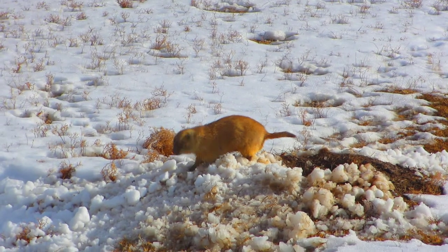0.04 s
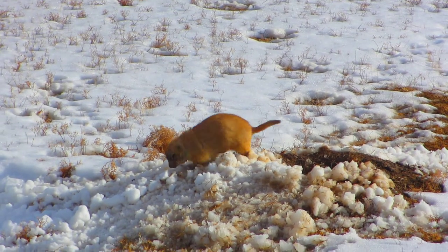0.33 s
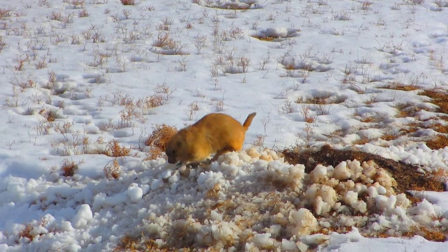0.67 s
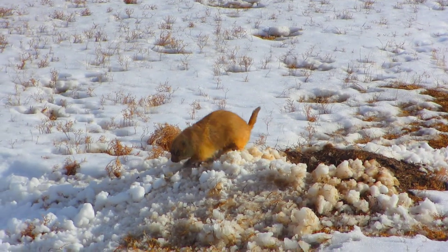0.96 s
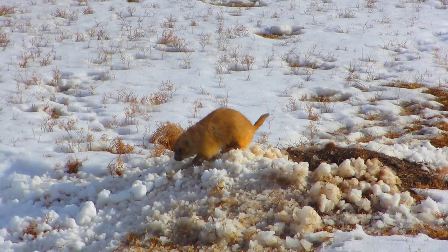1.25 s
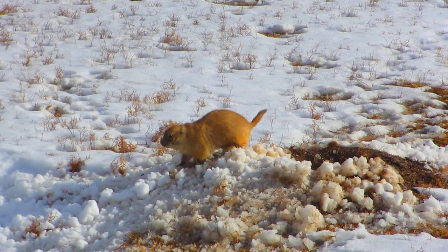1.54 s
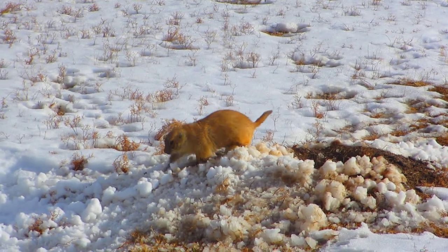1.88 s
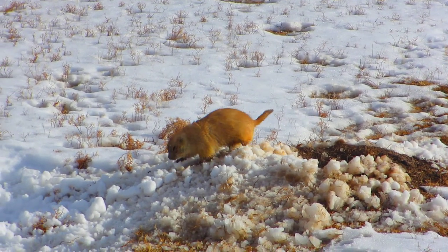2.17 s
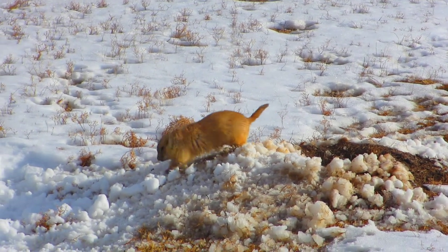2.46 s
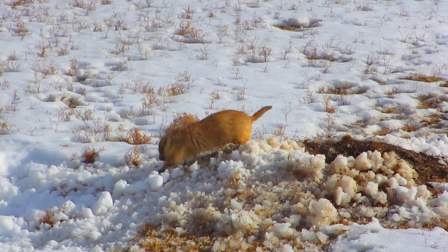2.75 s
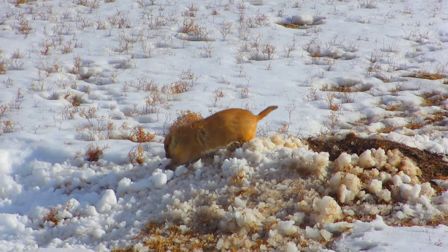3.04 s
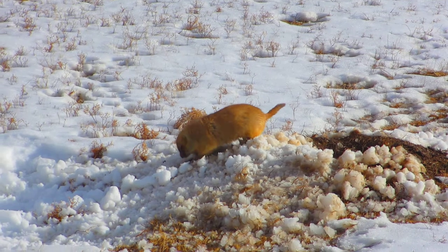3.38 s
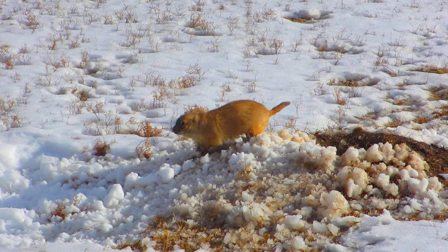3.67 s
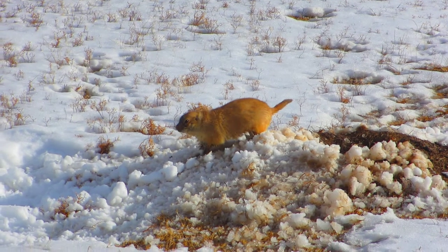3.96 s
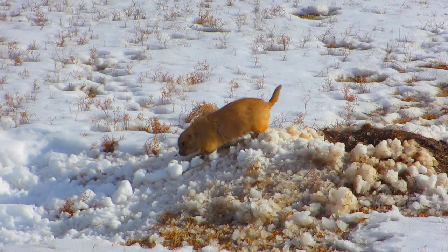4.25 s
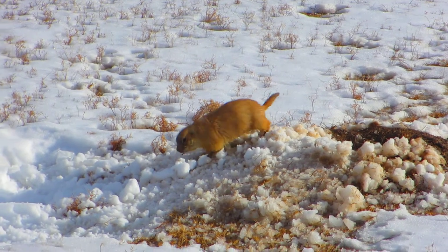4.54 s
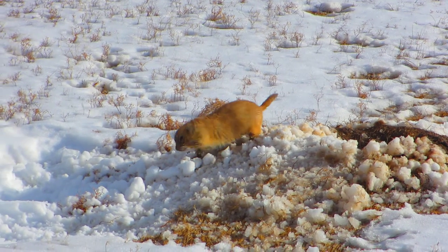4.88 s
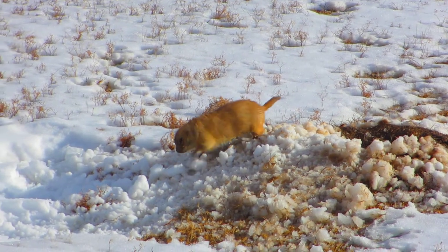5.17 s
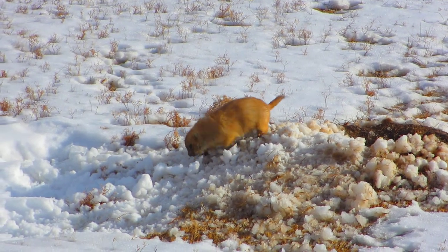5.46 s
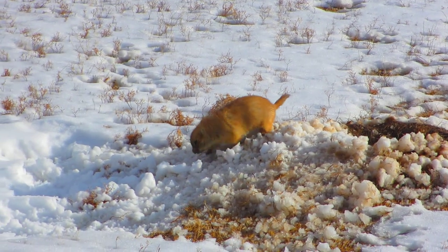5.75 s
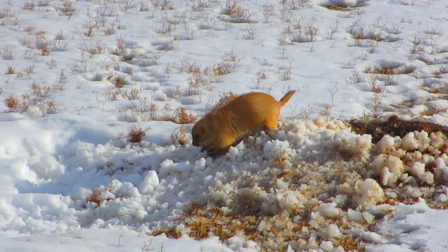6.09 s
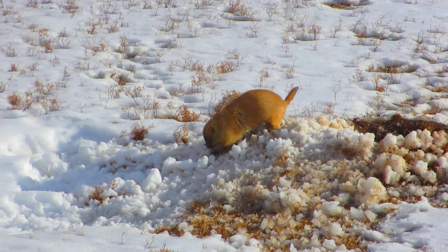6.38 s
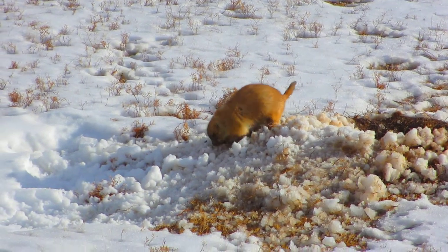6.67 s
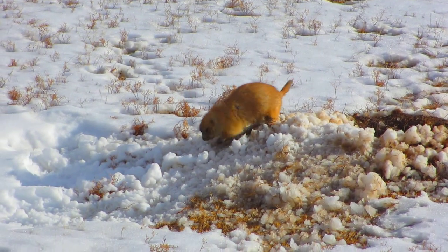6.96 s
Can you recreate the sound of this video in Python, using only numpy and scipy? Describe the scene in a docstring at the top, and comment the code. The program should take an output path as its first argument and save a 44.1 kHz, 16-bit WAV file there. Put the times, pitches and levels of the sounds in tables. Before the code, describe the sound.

Wind gusts thump the microphone over a far traffic drone, with two distant prairie dog yips and very faint snow scraping.

```python
"""Gusts of wind buffet a closely spaced microphone pair on a snowy prairie, their eddies thumping the ports.
The hardest gust overloads the pair and makes the gain control duck. Far traffic drones underneath,
with the camera's own faint whine and hiss. Two prairie dogs each give a distant rising and falling yip,
hoarse where the vocal folds turn chaotic; another scrapes softly at the snow, snapping its crust."""
import sys
import numpy as np
from scipy import signal
from scipy.fft import rfft, irfft
from scipy.io import wavfile
from scipy.ndimage import uniform_filter1d, map_coordinates

SR = 44100
rng = np.random.default_rng(int(sys.argv[2]) if len(sys.argv) > 2 else 0)


def materialize(psi):
    """Save the field psi as 16-bit PCM at rate SR to the path in sys.argv[1].

    A 1-D psi becomes a single channel; in a 2-D psi each row is a channel.
    """
    bounded = np.clip(np.atleast_2d(psi).T, -1, 1)
    quanta = np.round(bounded * 32767).astype(np.int16)
    wavfile.write(sys.argv[1], SR, quanta)


N = 309582
TIME = np.arange(N) / SR
FREQS = np.maximum(np.arange(N // 2 + 1) * SR / N, 1)


def from_db(db):
    """Decibels to gain."""
    return 10 ** (np.asarray(db) / 20)


def over_hz(rows):
    """Each column after the first, joined on a log-frequency axis."""
    hz, *columns = np.transpose(rows)
    return [np.interp(np.log(FREQS), np.log(hz), column) for column in columns]


def white():
    """Spectrum of fresh white noise."""
    return rfft(rng.standard_normal(N))


def noise(gain):
    """Noise with the given gain per frequency; rms 1."""
    x = irfft(white() * gain, N)
    return x / x.std()


def drift(rate_hz):
    """Random wandering, mostly slower than the given rate; spread 1."""
    return noise(1 / (1 + (FREQS / rate_hz) ** 2))


# Far rumble fading into microphone hiss, on the right. Each row: frequency in Hz, relative level in dB.
RUMBLE_COLOUR = [(22, -66), (50, -65), (115, -61), (200, -61.5), (310, -66), (410, -72.5), (650, -71),
                 (960, -73.5), (1900, -86), (2700, -94.5), (3800, -104.4), (6000, -108.2), (11500, -107.3),
                 (14200, -110.6), (15700, -111.3)]
# Engines standing out of the rumble. Each row: frequency in Hz, width in Hz, rise in dB.
ENGINE_DRONES = [(90, 1.8, 14), (138, 15.5, 8), (165, 22, 2), (259.9, 5.4, 10), (329.6, 9.5, 4.5),
                 (513, 8.2, 3.5), (618.3, 10, 7), (700, 7.1, 5), (789, 27, 3), (844.5, 14, 6),
                 (1330, 6.1, 11)]
# How the pair hears far sound. Each row: frequency in Hz, left over right in dB, coherence from 0 to 1,
# left phase lead in radians.
PAIR_RESPONSE = [(61, -10, 0.97, 4), (158, -11.5, 0.84, 2.6), (293, -7, 0.9, 2.33), (580, -6, 0.97, 1.9),
                 (1030, -6, 0.68, 1.27), (1380, -4.5, 0.52, 1.66), (2140, -2.5, 0.6, 0.48),
                 (3840, -3.5, 0.52, 0.86), (8540, -2.5, 0.55, 0.53), (13000, -1.5, 0.1, 1.3)]

def far_traffic(level_db=-1.14, waver_db=0.5):
    """Engines drone far across the prairie; the pair turns their bass nearly into opposite phase."""
    colour_db, = over_hz(RUMBLE_COLOUR)
    colour_db += sum(db / (1 + (2 * (FREQS - hz) / width) ** 2) for hz, width, db in ENGINE_DRONES)
    balance_db, coherence, lead = over_hz(PAIR_RESPONSE)
    right = white()
    shared = coherence * np.exp(1j * lead) * right
    left = from_db(balance_db) * (shared + np.sqrt(1 - coherence ** 2) * white())
    pair = irfft(np.array([left, right]) * from_db(colour_db) * np.sqrt(SR / 2), N)
    return pair * from_db(level_db + waver_db * drift(0.73))


def camera(whine_db=-96, whine_hz=2074, hiss_db=-74.5, hiss_hz=12300, hiss_width_hz=1500, pulse_hz=17):
    """The camera's own faint noise: a thin whine of three overtones and a high hiss that pulses quickly."""
    whine = sum(np.sin(2 * np.pi * k * whine_hz * TIME) for k in (2, 3, 6))
    colour = np.exp(-0.5 * ((FREQS - hiss_hz) / hiss_width_hz) ** 2)
    pulsing = (0.5 + 0.5 * np.cos(2 * np.pi * pulse_hz * TIME + drift(3))) ** 2
    hiss = np.array([noise(colour), noise(colour)])
    return from_db(whine_db) * whine + from_db(hiss_db) * pulsing * hiss


# Gusts at the microphones. Each row: start in seconds, level in dB, hold in seconds, eddy speed factor.
GUSTS = [(0.133, -14.5, 0.011, 0.56), (0.211, -23.5, 0.042, 0.93), (0.363, -13, 0.014, .85),
         (0.383, -13.5, 0.0254, 1.1), (0.427, -15.5, 0.061, 1.05), (0.507, -24, 0.0784, .95),
         (1.692, -23, 0.061, 0.83), (1.977, -23, 0.0514, 1.0), (2.1, -20, 0.0605, 0.88),
         (2.487, -27.5, 0.033, 0.81), (2.575, -29, 0.031, 0.73), (2.726, -24.5, 0.03, 0.82),
         (2.805, -25, 0.021, .8), (3.337, -24, 0.032, .92), (3.769, -34, 0.019, .8),
         (3.888, -27, 0.034, 0.91), (3.96, -31, 0.032, 0.76), (4.554, -27.5, 0.018, 0.85),
         (4.869, -16.5, 0.012, 1.1), (4.901, -10, 0.027, 1.0), (4.946, -20.5, 0.017, .9),
         (5.45, -26, 0.058, 0.8), (5.57, -25, 0.036, 0.99), (5.766, -30, 0.023, 0.71),
         (6.207, -36, 0.019, 0.75)]

def gust_strength(attack_s=0.00607, sag_db=3, release_share=0.332, breeze_db=-46.5, flutter_db=1):
    """Each gust rises fast, sags while it holds and dies away, over a wandering breeze."""
    power = from_db(breeze_db + 4 * np.tanh(drift(5))) ** 2
    for start, db, hold, _ in GUSTS:
        age = TIME - start
        attack = np.exp(-(np.minimum(age, 0) / attack_s) ** 2)
        release = np.exp(-np.maximum(age - hold, 0) / (release_share * hold))
        level = from_db(db - sag_db * np.clip(age / hold, 0, 1))
        power += (attack * release * level) ** 2
    return np.sqrt(power) * from_db(flutter_db * drift(22))


# Turbulence on the microphone ports at speed 1. Each row: frequency in Hz, relative level in dB.
TURBULENCE_COLOUR = [(18, -46), (45, -16.5), (80, 2), (140, 1.5), (220, -5.5), (400, -19.5), (800, -54),
                     (2000, -100)]

def turbulence(strength, reference_db=-20, speed_power=0.41, evenness=0.17):
    """A frozen pattern of eddies blows past: a stronger gust carries it faster, so it is brighter too."""
    speed_points = [(s, factor) for start, _, hold, factor in GUSTS for s in (start, start + hold)]
    speed = np.interp(TIME, *np.transpose(speed_points))
    speed *= np.maximum(strength / from_db(reference_db), 0.3) ** speed_power
    pattern = noise(from_db(over_hz(TURBULENCE_COLOUR)[0]))
    pressure = map_coordinates(pattern, [np.cumsum(speed)], order=3, mode="wrap")
    # the gust, more than the pattern, sets the loudness
    local_power = uniform_filter1d(uniform_filter1d(pressure ** 2, size=700), size=500)
    return strength * pressure / local_power ** (evenness / 2)


# Single eddies right on the ports. Each row: time in seconds, relative level in dB,
# half length in seconds, level offset of the wake in dB.
EDDY_THUMPS = [(0.1223, -2, 0.00067, 1), (.3645, -12, .0017, -8), (0.3896, -9, 0.0009, -8),
               (0.3972, -6, 0.0007, -10), (.4035, -4.5, .0011, -12), (.4385, -5, .001, -14),
               (0.445, -9, 0.0007, -6), (.4635, -12, 0.001, -12), (1.976, -11, 0.0017, -10),
               (2.088, -14, .0018, -14), (2.114, -13, .0009, -14), (2.1215, -8, 0.0014, -8),
               (4.8578, -2, 0.0019, -31), (4.8695, -1, 0.0012, -14), (4.8797, -4, .001, -20),
               (4.886, 10.5, 0.00062, -24)]

def eddies(wake_delay=6, wake_stretch=2):
    """An eddy thumps the ports with one push and one pull, and sheds a slower one spinning the other way."""
    pressure = np.zeros(N)
    for s, db, half_s, wake_db in EDDY_THUMPS:
        age = (TIME - s) / half_s  # in half lengths
        wake_age = (age - wake_delay) / wake_stretch
        for spin, u, level_db in ((0.68, age, db), (-1, wake_age, db + wake_db)):
            pressure -= spin * from_db(level_db) * u * np.exp((1 - u ** 2) / 2)
    return pressure


def wind(left_db=-3, left_lag_s=0.0001, swirl_db=-16, low_cut_hz=42):
    """Wind presses on the two ports in opposite phase, with a little swirl of its own on the left."""
    strength = gust_strength()
    right = turbulence(strength) + eddies()
    delayed = np.interp(TIME - left_lag_s, TIME, right)
    left = -from_db(left_db) * delayed + from_db(swirl_db) * turbulence(strength)
    # the deepest bass leaks away
    return irfft(rfft([left, right]) / np.sqrt(1 + (low_cut_hz / FREQS) ** 4), N)


# Snow crust breaking under claws. Each row: start in seconds, relative level in dB, pitch in Hz.
CRUST_SNAPS = [(.092, -73, 13000), (1.325, -73, 12960), (2.2, -71, 12720), (2.32, -71, 9400),
               (3.79, -73, 12930), (4.317, -73, 13300), (5.713, -70, 10580), (5.962, -68, 13100),
               (6.376, -66, 9900), (6.467, -71, 12300)]

def crust_snaps(decay_s=0.014, width_hz=1000, crumb_count=30, crumb_db=-78, size=4000):
    """Snaps and smaller random crumbs: each starts at once and dies quickly, ringing at its own pitch."""
    crumb_starts = rng.uniform(0, N / SR, crumb_count)
    crumbs = [(s, crumb_db, rng.normal(12000, 1500)) for s in crumb_starts]
    snaps = np.zeros(N + size)
    freqs = np.fft.rfftfreq(size, 1 / SR)
    decay = np.exp(-TIME[:size] / decay_s)
    for s, db, hz in CRUST_SNAPS + crumbs:
        crackle = irfft(rfft(rng.standard_normal(size)) / (1 + ((freqs - hz) / width_hz) ** 2))
        start = int(s * SR)
        snaps[start:start + size] += from_db(db) * decay * crackle / crackle.std()
    return snaps[:N]


# Two distant prairie dogs, right of centre. Each row: middle of the rasp in seconds, its half length in
# seconds, then in dB: relative level, offset above the second harmonic, left over right, dip in the rasp.
YIPS = [(0.195, 0.018, -55, -14, -6, 0.5), (1.801, 0.0078, -52.5, -8.5, -5, 4.5)]
# One pitch curve for each yip. Each point: time in seconds, pitch in Hz.
YIP_PITCH = [
    [(.156, 1480), (.172, 1825), (.205, 2060), (.215, 1810), (.232, 1910), (.26, 1760), (.3, 1580),
     (.33, 1530), (.384, 1385)],
    [(1.738, 1345), (1.755, 1666), (1.762, 1613), (1.786, 1790), (1.801, 1900), (1.812, 1820),
     (1.815, 1710), (1.84, 1630), (1.894, 1370)],
]
# Resonances of the throat. Each row: frequency in Hz, gain in dB.
THROAT_COLOUR = [(1500, -2), (2000, -2.5), (2900, -6.5), (3700, -2), (4300, -10), (5200, -5.5), (6700, -8),
                 (7600, -19)]

def yip(pitch, rasp_at_s, rasp_half_s, db, overtones_db, balance_db, rasp_dip_db,
        swell_db=4, sag_db=5, dulling_db=5, flutter_db=2, trim_db=-1, edge_s=0.0045):
    """A prairie dog's thin call scoops up hoarsely, cracks into a rasp and sinks clear, fading."""
    times, pitch_hz = np.transpose(pitch)
    start, end = times[0], times[-1]
    rise_left = np.clip((rasp_at_s - TIME) / (rasp_at_s - start), 0, 1)
    fall = np.clip((TIME - rasp_at_s) / (end - rasp_at_s), 0, 1)
    strain = np.exp(-0.5 * ((TIME - rasp_at_s) / rasp_half_s) ** 4)
    roughness = np.where(TIME < rasp_at_s, 0.486, 0.15)  # hoarse rise, clear fall
    roughness += (0.8 - roughness) * strain  # roughest in the rasp
    hz = np.interp(TIME, times, pitch_hz) * (1 + 0.00583 * drift(25))
    jitter = 0.028 * (roughness + strain) * drift(300)
    phase = 2 * np.pi * np.cumsum(hz * (1 + jitter)) / SR
    voice = np.zeros(N)
    for k in range(1, 5):
        # chaotic vocal folds smear each harmonic into a band of noise, the higher ones more
        smear = np.minimum(roughness * k / 2, 1)
        rasp = drift(480) * np.cos(k * phase)
        tone = np.sqrt(1 - smear ** 2) * np.sin(k * phase) + smear * rasp
        colour_db = np.interp(k * hz, *np.transpose(THROAT_COLOUR))
        if k > 2:
            colour_db += overtones_db - dulling_db * fall * (k - 2)
        voice += tone * from_db(colour_db + flutter_db * drift(75))
    voice *= 1 + 0.43 * roughness * np.cos(phase / 2)  # strong and weak cycles alternate
    opening = np.clip(np.minimum(TIME - start, end - TIME) / edge_s, 0, 1)
    level_db = db + trim_db - swell_db * rise_left - sag_db * fall ** 2 - rasp_dip_db * strain
    return np.sqrt(2) * voice * opening * from_db(level_db) * from_db([[balance_db], [0]])


# A third prairie dog's paws, faint at the microphones. Each row: middle of the scrape in seconds,
# relative level in dB, half length in seconds.
PAW_SCRAPES = [(.91, -74.5, 0.037), (1.18, -76, 0.061), (1.32, -76, 0.027), (2.06, -77, 0.033),
               (2.64, -73.5, 0.038), (2.94, -72.5, 0.022), (3.18, -73, 0.021), (3.255, -69.5, 0.0093),
               (3.46, -77, 0.02), (5.402, -68, 0.014), (5.45, -73, 0.025), (5.76, -73, 0.024),
               (5.80, -66, 0.014), (5.91, -69, 0.018), (5.965, -72, 0.0077), (6.22, -77, 0.037),
               (6.48, -73, 0.069), (6.56, -74, 0.023)]
# The hiss of scraped snow. Each row: frequency in Hz, relative level in dB.
SNOW_COLOUR = [(3000, -25), (6000, -10), (8500, -2.5), (11000, 0.5), (13000, -2.5), (16000, -8)]

def paw_scrapes(level_db=2, grain_db=3, grain_hz=250, stroke_db=0.8, stroke_hz=35, stereo_width=0.39):
    """Paws in the snow: soft grainy swishes high in the treble, in uneven strokes, with small snaps."""
    colour = from_db(over_hz(SNOW_COLOUR)[0])
    swish = noise(colour) + stereo_width * noise(colour) * np.array([[1], [-1]])
    power = sum(from_db(db) ** 2 * np.exp(-0.5 * ((TIME - s) / half) ** 2) for s, db, half in PAW_SCRAPES)
    scraping = swish * np.sqrt(power) + crust_snaps()
    return scraping * from_db(level_db + grain_db * drift(grain_hz) + stroke_db * drift(stroke_hz))


def gain_control(pair, threshold_db=-6, slope=0.65, attack_s=0.005, release_s=0.2):
    """Peaks over the threshold pull the gain down, too late for the sharpest one; it creeps back."""
    peak_db = 20 * np.log10(np.abs(pair).max(axis=0) + 1e-9)
    cut_db = slope * np.maximum(peak_db - threshold_db, 1e-9)
    release = TIME / release_s
    held_db = np.exp(np.maximum.accumulate(np.log(cut_db) + release) - release)  # decaying peak hold
    pole = np.exp(-1 / (attack_s * SR))
    return pair * from_db(-signal.lfilter([1 - pole], [1, -pole], held_db))


def scene():
    """The prairie as it reaches the microphone pair, with the camera's own noise."""
    yips = sum(yip(pitch, *row) for pitch, row in zip(YIP_PITCH, YIPS))
    return far_traffic() + wind() + yips + paw_scrapes() + camera()


def record(dry):
    """Gain control, a limiter that flattens both channels at once with a snap, and a steep top cut."""
    ducked = gain_control(dry)
    limited = ducked / np.maximum(np.abs(ducked).max(axis=0), 1)
    top_cut = signal.ellip(12, 0.1, 70, 15750, fs=SR, output="sos")
    return signal.sosfilt(top_cut, limited)


dry = scene()
out = record(dry)
materialize(out)
```